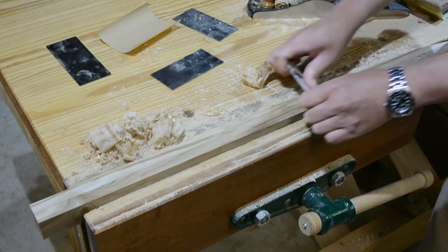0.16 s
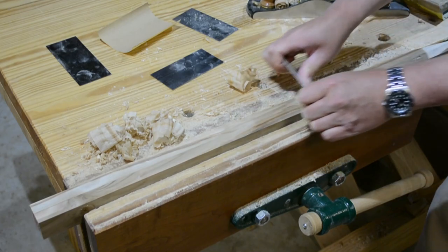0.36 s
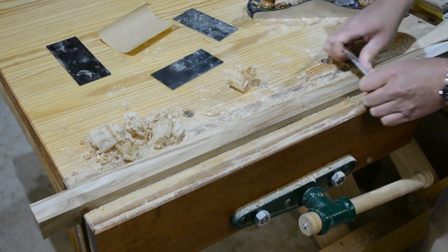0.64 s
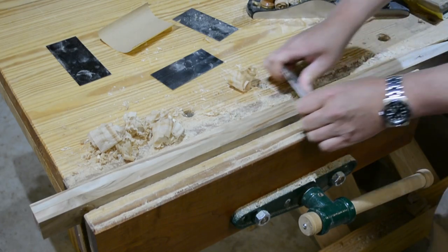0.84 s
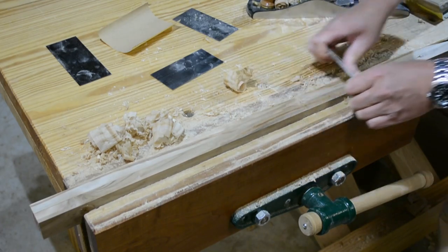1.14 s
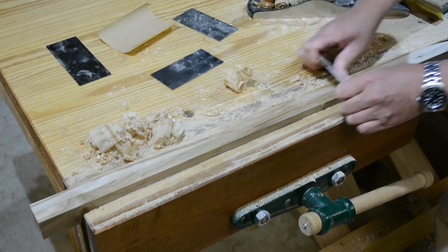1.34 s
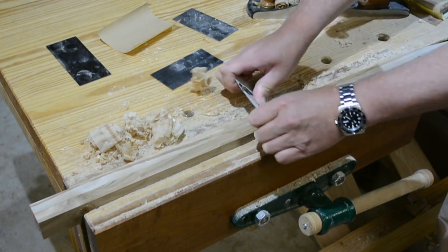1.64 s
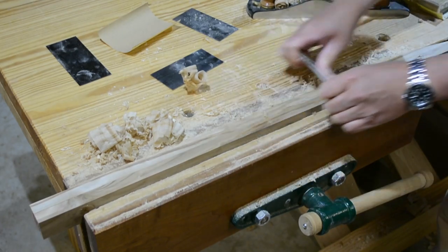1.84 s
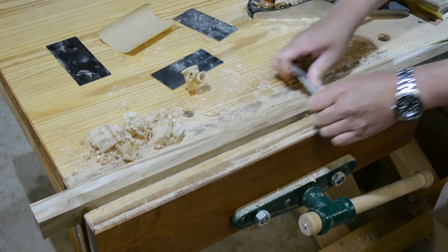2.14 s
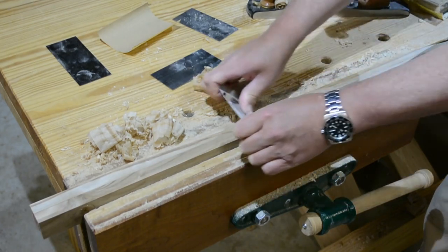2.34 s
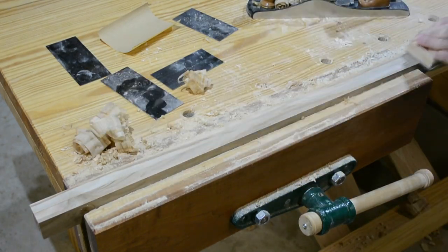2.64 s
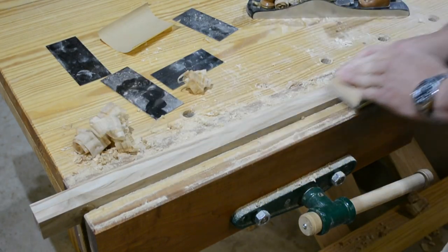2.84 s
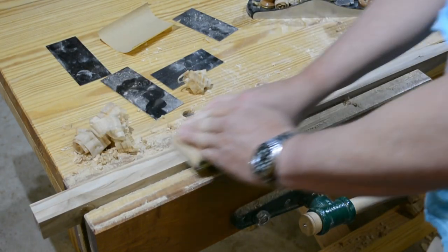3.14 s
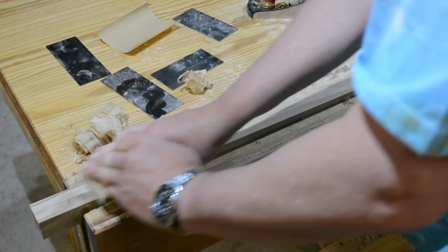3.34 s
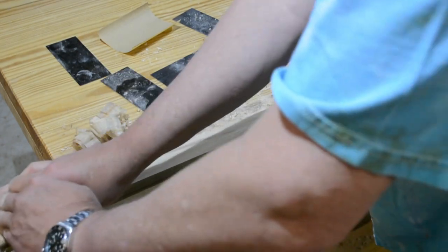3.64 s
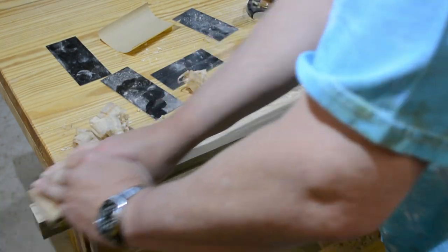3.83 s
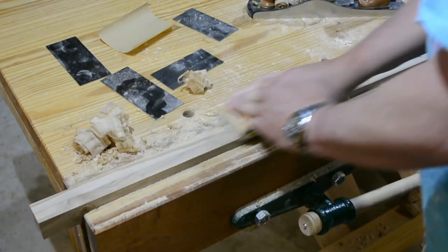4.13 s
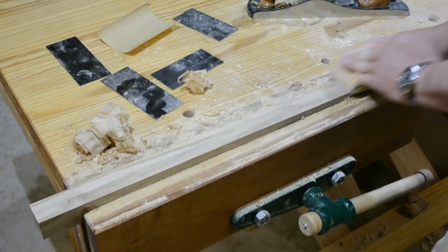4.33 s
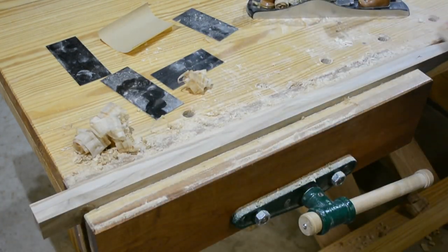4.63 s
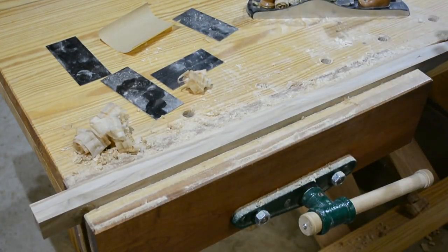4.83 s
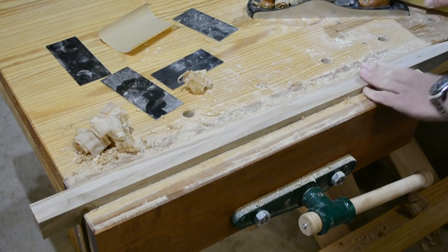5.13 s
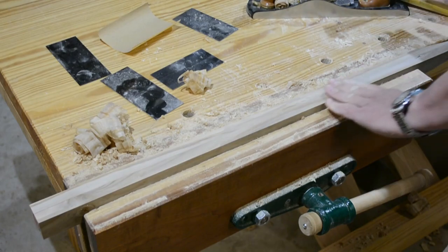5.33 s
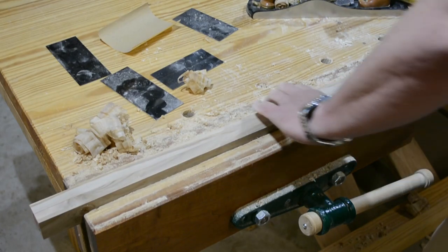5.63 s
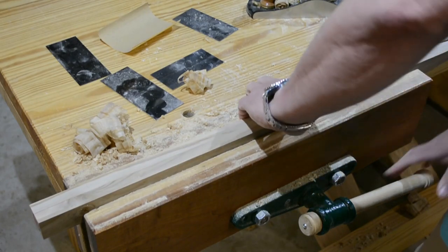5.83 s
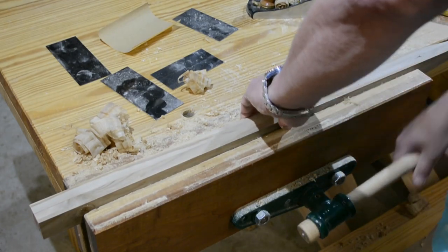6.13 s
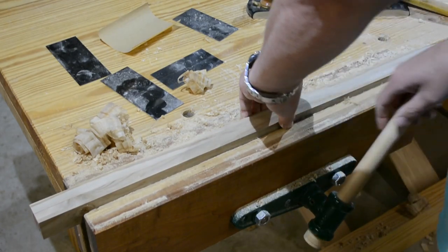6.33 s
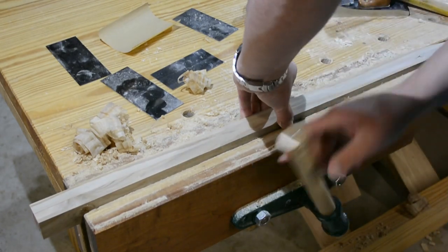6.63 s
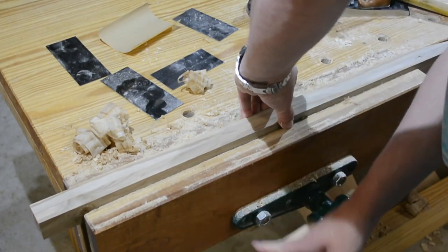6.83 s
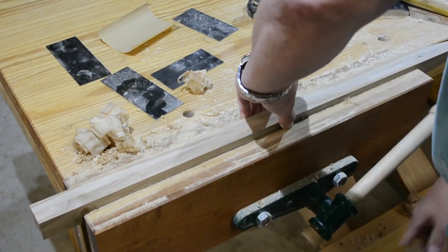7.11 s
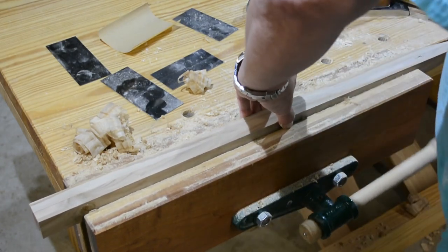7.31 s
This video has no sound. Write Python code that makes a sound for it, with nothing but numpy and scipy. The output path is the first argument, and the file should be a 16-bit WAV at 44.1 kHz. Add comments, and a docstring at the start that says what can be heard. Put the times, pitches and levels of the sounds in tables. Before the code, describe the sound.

In a small, quiet workshop, close stereo microphones catch a steel scraper finishing one stroke on a wooden rail, dragging lightly back, then cutting three more bright, ringing strokes with small rattling tocks between. A sanding block hisses out and back with a hollow woody drone. A hand taps and brushes the wood softly, then a vise jaw clunks hard and its wooden handle clacks.

```python
"""A steel scraper stroke already under way on a wooden rail, then a light drag back and three more strokes.
A sanding block runs out and back, a palm wipes the dust, then a vise jaw clunks and its handle drops.
Rubbing is noise of tiny slips through resonances; knocks are short pushes plus decaying modes.
Small workshop with faint hum and reverberation, taken by a close stereo microphone pair."""
import sys
import numpy as np
from scipy import signal
from scipy.fft import rfft, irfft
from scipy.io import wavfile
from scipy.ndimage import uniform_filter1d

SR = 44100
rng = np.random.default_rng(int(sys.argv[2]) if len(sys.argv) > 2 else 0)


def master_out(mix):
    """Clip the mix to full scale and print it as 16-bit PCM to the path in sys.argv[1]."""
    frames = np.transpose(np.atleast_2d(mix))
    ceiling = np.clip(frames, -1, 1)
    pcm = np.round(ceiling * 32767).astype(np.int16)
    wavfile.write(sys.argv[1], SR, pcm)


N = 329427
TIME = np.arange(N) / SR

# relative spectrum of rubbing: (frequency [Hz], density [dB per Hz])
FIZZ = [(100, -32), (300, -9.5), (1000, -9), (3500, 4.5), (4500, 3), (6000, 0), (8300, 1.5), (10500, -0.5),
        (12500, -8), (15500, -21.5)]


def amp(db):
    """Decibels to gain."""
    return 10 ** (np.asarray(db) / 20)


def evened(x):
    """Scales to rms 1."""
    return x / np.sqrt(np.mean(x ** 2) + 1e-20)


def read(points, hz):
    """Reads a table on a log-frequency axis."""
    table_hz, value = np.transpose(points)
    return np.interp(np.log(hz + 1), np.log(table_hz + 1), value)


def curve(rows):
    """A (time [s], value) curve at every sample."""
    return np.interp(TIME, *np.transpose(rows))


def add(mix, s, sound):
    """Mixes a sound in at time s."""
    part = mix[max(round(s * SR), 0):][:len(sound)]
    part += sound[:len(part)]


def colour(x, spectrum, size=4096):
    """Causal minimum-phase filter with the given spectrum."""
    log_gain = np.log(amp(read(spectrum, np.abs(np.fft.fftfreq(size, 1 / SR)))))
    taps = np.fft.ifft(np.exp(np.conj(signal.hilbert(log_gain)))).real
    return signal.oaconvolve(x, taps[:size // 2])[:len(x)]


def resonances(x, modes, place=0, node_db=0):
    """Band-pass resonances; each fades as the contact passes its nodes (place in half waves at 1 kHz)."""
    out = 0
    for k, (hz, width, db) in enumerate(modes):
        # bending waves shorten with the square root of frequency
        shape = np.cos(2 * np.pi * place * np.sqrt(hz / 1000))
        band = signal.lfilter(*signal.iirpeak(hz, hz / width, SR), x)
        out = out + (-1) ** k * amp(db + node_db * shape) * band
    return out


def focus(x, hz, octaves, depth_db):
    """Favours the band round a moving centre, at constant power."""
    f, t, z = signal.stft(x, SR, nperseg=512)
    away = np.log2((f[:, None] + 1) / np.interp(t, TIME, hz)) / octaves
    gain = amp(depth_db * np.exp(-away ** 2 / 2))
    power = np.mean(abs(z) ** 2, axis=1)
    power_gain = power @ gain ** 2 / power.sum()
    return signal.istft(z * gain / np.sqrt(power_gain), SR, nperseg=512)[1][:N]


def wander(rate_hz):
    """Smooth random curve of rms 1, up to about the given rate."""
    lowpass = np.exp(-(np.fft.rfftfreq(N, 1 / SR) / rate_hz) ** 2)
    return evened(irfft(rfft(rng.standard_normal(N)) * lowpass, N))


def friction(grip, grain_db):
    """Countless tiny slips, whose size follows the momentary grip."""
    return evened(rng.standard_normal(N) * amp(grain_db * grip))


def contact(start, end, attack_s, release_t60):
    """Gain of a rub: it rises from start and, after end, dies away."""
    rise = np.clip((TIME - start) / attack_s, 0, 1)
    return rise * amp(-60 * np.maximum(TIME - end, 0) / release_t60)


def swell(times, db, start_db, end_db):
    """Gain that grows to db at the middle of three times and eases off again by start_db and end_db."""
    away = np.interp(TIME, times, [-1, 0, 1])
    return amp(db - np.where(away < 0, start_db, end_db) * abs(away) ** 1.04)


def shop_air():
    """Steady coloured room noise with a faint, slightly wavering hum."""
    # room noise: (frequency [Hz], relative density [dB per Hz])
    air = [(15, -80), (25, -52), (101, -19), (183, -9), (209, -9), (281, -3.5), (313, -8), (421, -7),
           (522, -5), (631, -4.5), (996, -5.5), (2010, -10), (3170, -19.5), (9810, -33), (15500, -40)]
    # hum of the shop: (frequency [Hz], rms level [dB])
    hum_tones = [(78, -100.5), (100, -92.5), (283, -86)]
    air_db = -69.5
    hum = 0
    for hz, db in hum_tones:
        cycles = hz * TIME + 0.13 * wander(rate_hz=5.3)
        hum = hum + amp(db) * np.sqrt(2) * np.sin(2 * np.pi * cycles)
    return amp(air_db) * evened(colour(rng.standard_normal(N), air)) + hum


def soft_rubs():
    """Faint dry rubs from uneven friction and dull soft rustles from smooth noise, between the louder work."""
    # relative spectra of dry rub and soft rustle: (frequency [Hz], density [dB per Hz])
    dry_spectrum = [(500, -12), (2000, 8.5), (4000, 6), (7000, 3.5), (10500, 3), (13000, -10), (16000, -25)]
    soft_spectrum = [(400, -21), (900, -3.5), (1500, 2.5), (2500, -6.5), (3500, -4.5), (5000, -16),
                     (9000, -49)]
    # faint dry rubs, round the scraper's light drag, after strokes, in the palm's wipe and at the vise:
    # (start [s], end [s], level [dB])
    dry_rubs = [(.29, .49, -83), (0.492, .585, -62), (2.42, 2.498, -78), (4.99, 5.12, -81),
                (5.114, 5.152, -63.5), (5.24, 5.553, -73.5), (5.6, 5.95, -79.5), (6.0, 6.038, -77.5),
                (6.11, 6.26, -78.5), (6.34, 6.56, -80.5), (6.633, 6.83, -82), (7.17, 7.26, -86),
                (7.38, 7.445, -76.5)]
    # dull soft rustles, the first two round the light drag:
    # (start [s], strongest [s], time from which it fades, may precede its start [s], level [dB])
    rustles = [(0.304, 0.373, 0.52, -68), (0.482, 0.56, 0.71, -54), (5.09, 5.165, 4.9, -66),
               (5.583, 5.71, 6.22, -65), (6.72, 6.81, 7.5, -77), (7.342, 7.42, 8.1, -72)]
    dry_noise = evened(colour(friction(wander(rate_hz=300), grain_db=1.5), dry_spectrum))
    soft_noise = evened(colour(rng.standard_normal(N), soft_spectrum))
    rub_gains = [amp(db) * contact(start, end, attack_s=0.029, release_t60=0.32)
                 for start, end, db in dry_rubs]
    rub_gain = np.max(rub_gains, axis=0)
    rustle_gain = 0
    for *times, db in rustles:
        gate = contact(times[0], times[2], attack_s=0.044, release_t60=0.2)
        rustle_gain = rustle_gain + gate * swell(times, db, start_db=7, end_db=22)
    return rub_gain * dry_noise + rustle_gain * soft_noise


def knocks(rows, modes, spectrum, thud_t60, rattle, ring_db, damping, spot_db):
    """Each blow is a push with a brief rattle, plus ringing modes, coloured by where and how hard it lands."""
    t, out, ring = np.arange(SR * 3 // 5) / SR, np.zeros(N), 0
    for k, (hz, db, t60) in enumerate(modes):
        ring = ring + (-1) ** k * amp(db - 60 * damping * t / t60) * np.sin(2 * np.pi * hz * t)
    for s, db, hard_hz, note_hz in rows:
        chatter = rng.standard_normal(len(t)) * amp(-60 * t / thud_t60)
        push = signal.unit_impulse(len(t)) + rattle * chatter / np.linalg.norm(chatter)
        thud = colour(push, spectrum)
        blow = thud / np.linalg.norm(thud) + amp(ring_db) * ring / np.linalg.norm(ring)
        blow = blow + resonances(blow, [(note_hz, note_hz / 5, spot_db)])
        blow = signal.lfilter(*signal.butter(3, hard_hz, fs=SR), blow)  # softer contacts are duller
        add(out, s, amp(db) * blow / (2 * np.std(blow[:SR // 100])))
    # small things radiate little bass
    return signal.sosfilt(signal.butter(2, 85, "high", fs=SR, output="sos"), out)


# In the five functions below, the tables have these columns:
# blows: (time [s], level [dB], hardness as low-pass corner [Hz], note favoured by the spot struck [Hz])
# modes: (frequency [Hz], relative level [dB], t60 before division by damping [s])
# push: (frequency [Hz], relative density [dB per Hz])
def finger_taps():
    """Fingers land on the rail: a very short slap and quickly damped modes."""
    blows = [(5.051, -70, 11000, 8000), (5.166, -45, 2200, 676), (5.175, -41, 5970, 1910),
             (5.212, -51, 11000, 1190), (7.444, -61, 11000, 8000)]
    modes = [(475, -7, 0.25), (680, -14, .2), (1232, 6.5, 0.15), (1450, 7, 0.12), (2040, 3.5, 0.073),
             (2600, -14, .1)]
    push = [(150, -33), (480, -9), (700, -8), (920, -3), (1200, 10), (2100, -13), (3500, -12.5),
            (6000, -20), (11000, -11), (15000, -20)]
    return knocks(blows, modes, push, thud_t60=0.0078, rattle=1.2, ring_db=-5.0, damping=3.7, spot_db=-4)


def screw_clinks():
    """The iron screw of the vise clinks in a few high modes."""
    blows = [(6.146, -51, 5000, 2740), (6.902, -60, 4500, 2620)]
    modes = [(2670, 2, 0.19), (2730, -3, 0.14), (2910, -18, .2), (4160, 1, .15)]
    push = [(1200, -45), (2300, 3), (2800, 5.5), (3400, -8), (4200, -4.5), (8000, -32)]
    return knocks(blows, modes, push, thud_t60=0.098, rattle=1.6, ring_db=-6.0, damping=2.1, spot_db=1)


def handle_knocks():
    """The wooden vise handle slides in its socket and hits its end cap, a clack with damped modes."""
    blows = [(6.878, -47.5, 785, 716), (6.917, -43.5, 840, 596), (6.932, -40, 1150, 760),
             (6.950, -43.5, 750, 277), (7.181, -54, 900, 750), (7.214, -29, 1590, 890),
             (7.266, -40.5, 1310, 890)]
    modes = [(490, -11, 0.36), (645, -19, 0.29), (777, -27, 0.51), (869, 3.5, 0.14), (960, -3, 0.11),
             (1006, -5, 0.44), (1080, -2.5, 0.76), (1140, -3, 0.66), (1330, -22, 0.37), (1516, -3, 0.32),
             (1825, -32, 0.14)]
    push = [(80, -48), (160, -26), (270, -12), (370, -18.5), (490, -1.5), (930, -2), (1500, -10),
            (2000, -20), (4500, -13.5), (9000, -22)]
    return knocks(blows, modes, push, thud_t60=0.12, rattle=1.8, ring_db=-6.5, damping=2.5, spot_db=2.5)


def jaw_knocks():
    """The vise jaw shifts and seats, each blow a thud that rings its modes."""
    blows = [(6.012, -48.5, 700, 520), (6.028, -46.5, 815, 278), (6.054, -39.5, 1170, 830),
             (6.093, -41.5, 1410, 1010), (6.113, -37.5, 750, 505), (6.146, -26.5, 2100, 1270),
             (6.175, -30, 1180, 720), (6.519, -55.5, 1110, 770), (6.845, -48.5, 900, 286)]
    modes = [(149.5, -19, 0.55), (447, -14, 0.42), (487.4, -15, 0.45), (591, -8, 0.27), (675, 0, 0.38),
             (728.5, -2.5, 0.53), (877, -18, .37), (1030, -12, 0.38), (1210, 1, 0.29), (1270, -2, 0.43),
             (1320, -0.5, 0.32), (1408, -7, 0.33), (1610, -25, 0.24), (1730, -21, 0.28)]
    push = [(50, -28), (90, -15), (150, -15.5), (200, -16.5), (280, -8.5), (370, -12.5), (500, 1.5),
            (750, 3), (1100, -6), (1800, -2.5), (2200, -26), (9000, -30)]
    return knocks(blows, modes, push, thud_t60=0.085, rattle=1.6, ring_db=-3.5, damping=1.57, spot_db=1.0)


def set_downs():
    """The scraper is set down on the rail, a rattling tock that rings the rail's modes."""
    blows = [(.605, -35.5, 1740, 915), (.626, -44, 900, 467), (.992, -56, 780, 580),
             (1.239, -40.5, 3500, 1740), (1.984, -38, 3320, 776), (2.005, -40, 1020, 490)]
    modes = [(469, -8.5, 0.25), (586, 0, 0.23), (738, 0.5, 0.27), (869.6, 7, 0.31), (1854, -3, 0.31),
             (1954, 3.5, 0.16), (2120, -10, 0.12), (2820, -13, 0.068)]
    push = [(70, -22), (140, -13.5), (360, -13), (470, 2), (650, -2.5), (930, 1), (1320, -17), (1850, -4),
            (2500, -16), (9000, -26)]
    return knocks(blows, modes, push, thud_t60=0.078, rattle=3.8, ring_db=-5.5, damping=1.07, spot_db=5)


def sander():
    """Grit hisses; near the vise the block rings higher, away from it bench top and rail drone and boom."""
    # passes out, back, and sliding off the end on the block's edge:
    # (start [s], end [s], grit hiss [dB], body of the wood [dB], hollow boom [dB]), before place and pressure
    passes = [(2.507, 3.593, -53, -1, -57), (3.702, 4.639, -52, 1.5, -57), (4.63, 4.863, -64, -4, -83)]
    # the block's way along the rail: (time [s], distance from the free end [m])
    travel = [(2.5, 0.85), (2.75, 0.86), (3.0, 0.63), (3.12, 0.39), (3.42, 0.083), (3.7, .03), (3.88, 0.1),
              (4.32, .62), (4.45, 0.84), (4.85, 1.17)]
    # how hard the hands bear on the block: (time [s], pressure [dB])
    press = [(2.63, -11.5), (2.81, -2.5), (2.96, -5), (3.08, 3), (3.33, -0.5), (3.52, 3.5), (3.7, -5),
             (3.95, 2), (4.11, -2.5), (4.32, 0), (4.42, -3.5), (4.76, -2.5), (4.88, -8)]
    # resonances of block, bench top and hollow boom: (frequency [Hz], width [Hz], relative level [dB])
    block_modes = [(1372, 95, 4.5), (1587, 130, 3.5), (1774, 99, 5), (2076, 380, -1.5), (2520, 180, -0.5),
                   (2760, 210, 1), (3420, 1550, -8.5)]
    bench_modes = [(756, 69, -2), (832, 39, 0.5), (942, 72, 1), (1050, 216, 1), (1207, 263, 1.5)]
    boom_modes = [(315, 35, -22.5), (462, 42, -0.5), (511, 46, 2), (599, 50, -1.5)]
    # high rail mode singing under the grit: (frequency [Hz], width [Hz], level before the place gain [dB])
    rail_sing = [(3086, 46, 5)]
    vise_m, vise_reach_m = 0.56, 0.3  # where the vise holds the rail, and how far its hold is felt
    free_ring_hz, held_ring_hz = 1607, 2226  # the held part of the rail is stiffer
    half_wave_m = 0.287  # at 1 kHz
    drone_hz, drone_hz_per_m_s = 640, 438  # a faster block excites higher modes of the bench top
    dead_m, dead_reach_m, dead_db = 0.7, 0.17, 8.8  # dead spot of the bench top

    metres, press_db = curve(travel), curve(press)
    held = np.exp(-((metres - vise_m) / vise_reach_m) ** 2)
    ring_hz = free_ring_hz + (held_ring_hz - free_ring_hz) * held
    place = metres / half_wave_m
    speed = abs(uniform_filter1d(np.gradient(metres) * SR, size=SR // 6))
    grip = wander(rate_hz=600)

    hiss = evened(colour(friction(grip, grain_db=0.8), FIZZ))
    hiss = hiss + amp(8.5 - 21 * metres) * resonances(hiss, rail_sing)  # most near the free end
    hiss = focus(hiss, 2.0 * ring_hz, octaves=0.29, depth_db=1.5)  # the block's next mode follows its ring
    hiss = amp(0.18 * press_db + 1.7 * held) * hiss

    ring = resonances(friction(grip, grain_db=0.5), block_modes, place, node_db=0.5)
    ring = evened(colour(ring, [(900, -33.5), (1400, -1.0), (3800, 2.5), (6500, -22.5)]))
    ring = focus(ring, ring_hz, octaves=0.73, depth_db=25.5)

    drone = resonances(friction(grip, grain_db=0.4), bench_modes, place, node_db=1.5)
    drone = evened(colour(drone, [(350, -10.0), (700, 1), (1350, 1.5), (3000, -30)]))
    drone = focus(drone, drone_hz + drone_hz_per_m_s * speed, octaves=0.53, depth_db=7)
    dead = np.exp(-((metres - dead_m) / dead_reach_m) ** 2)
    drone_db = 0.3 * press_db - 47.0 - 4.1 * metres - dead_db * dead

    boom = resonances(friction(grip, grain_db=2.5), boom_modes)
    boom = evened(colour(boom, [(100, -10), (300, -10), (650, -8.5), (2000, -27)]))
    boom = amp(3.5 * metres - 21 * held) * boom  # the vise damps the boom

    body = amp(press_db - 42.5) * ring + amp(drone_db) * drone
    out = 0
    for start, end, hiss_db, body_db, boom_db in passes:
        layers = amp(hiss_db) * hiss + amp(body_db) * body + amp(boom_db) * boom
        out = out + contact(start, end, attack_s=0.12, release_t60=0.3) * layers
    return out


def scraper():
    """The burr tears fibres in clumps: fizz at the edge, ringing in the bowed blade and in the rail."""
    # strokes, the light one a drag backwards: (touches [s], presses hardest [s], lifts [s], level [dB],
    # centre of the ring at the hardest push [Hz], extra ring of the wood [dB])
    strokes = [(-.15, 0.08, 0.26, -.5, 1990, 2), (0.465, 0.564, 0.66, -13, 1610, 6),
               (0.641, 0.831, 0.92, 0, 1930, -0.5), (1.257, 1.504, 1.633, 0.5, 2000, 1),
               (1.998, 2.24, 2.368, 0.5, 2030, -0.5)]
    # the edge catches in the grain: (time [s], level before a 2 dB cut [dB])
    catches = [(0.7692, -33), (0.7947, -33), (0.835, -34), (0.8618, -28.5), (2.167, -36), (2.2296, -27.5),
               (2.2569, -30)]
    # resonances of blade and wood: (frequency [Hz], width [Hz], relative level [dB])
    blade_modes = [(1760, 90, 2), (2037, 210, -1.5), (2150, 154, 0.5), (2321, 77, 1), (2660, 230, -7),
                   (2970, 470, -18), (3670, 83, -15), (3920, 74, -17.5)]
    wood_modes = [(294, 78, -19), (440, 39, -10), (567, 26, -4.5), (737, 112, -5), (830, 137, -2.5),
                  (1010, 130, -4), (1200, 63, -2), (1507, 117, -1.5)]
    # a steel edge is brighter than grit: (frequency [Hz], extra level [dB])
    steel_tilt = [(3000, 0.5), (5500, -0.5), (9000, 2.5), (14000, 5)]
    bite_s, lift_t60 = 0.1, 0.21  # the edge bites in and lifts off
    ring_sag = 0.032  # share by which the ring sinks in half a stroke
    wood_lag_s = 0.05  # the rail answers later than the blade, as the edge digs in
    # one rail mode climbs as the edge nears the vise [Hz]: at the start, the hardest push and the end
    wood_glide = (680, 1200, 1440)
    # layers: dB at the hardest push before the stroke's level, dB less at the start, dB less at the end
    cut_fizz, cut_blade, cut_wood = (-50.5, 8.5, 8), (-39.5, 23.3, 13.9), (-49, 25, 7.4)

    grip = evened(wander(rate_hz=200) + wander(rate_hz=37))
    fizz = evened(colour(colour(friction(grip, grain_db=1.2), FIZZ), steel_tilt))
    tearing = friction(grip, grain_db=0.5)
    blade = resonances(tearing, blade_modes)
    blade = evened(colour(blade, [(500, -17.5), (1500, -12.5), (4000, -12.0), (7000, -27)]))
    wood = resonances(tearing, wood_modes)
    wood = evened(colour(wood, [(100, -4), (300, -3.5), (1600, -3.5), (4000, -24)]))

    ring_hz, wood_hz, gains = np.zeros(N), np.zeros(N), np.zeros((3, N))
    for start, peak, end, db, hz, wood_db in strokes:
        times = [start, peak, end]
        later = [start, min(peak + wood_lag_s, end), end]
        gate = amp(db) * contact(start, end, bite_s, lift_t60)
        wood_gain = amp(wood_db) * swell(later, *cut_wood)
        gains += gate * np.array([swell(times, *cut_fizz), swell(times, *cut_blade), wood_gain])
        begun = TIME >= start
        wood_hz = np.where(begun, np.interp(TIME, times, wood_glide), wood_hz)
        sinking_hz = hz * (1 + ring_sag * np.interp(TIME, times, [1, 0, -1]))
        ring_hz = np.where(begun, sinking_hz, ring_hz)
    blade = focus(blade, ring_hz, octaves=0.17, depth_db=8.5)  # the ring sinks as the blade travels
    # and lower modes of the rail join in
    wood = focus(wood, 1150 * (ring_hz / 1920) ** 4, octaves=1.0, depth_db=7.5)
    wood = focus(wood, wood_hz, octaves=0.14, depth_db=5)
    out = (gains * [fizz, blade, wood]).sum(0)

    snap = resonances(signal.unit_impulse(SR // 10), blade_modes)
    for s, db in catches:
        add(out, s, amp(db - 2.0) * snap / abs(snap).max())
    return out


def reverberate(x, size=20):
    """Sparse reflections of random sign, each band dying at its own speed; energy 1."""
    # the workshop's reverberation: (frequency [Hz], t60 [s])
    shop = [(100, 0.37), (500, 0.4), (1500, 0.23), (4000, 0.44), (12000, 0.05)]
    taps, at = np.zeros(SR), np.arange(SR // 250, SR - size, size)
    taps[at + rng.integers(0, size, len(at))] = rng.choice([-1., 1.], len(at))
    hz, t, z = signal.stft(taps, SR, nperseg=256)
    t60 = read(shop, hz)[:, None]
    tail = signal.istft(z * amp(-60 * t / t60) / np.sqrt(t60), SR, nperseg=256)[1]
    return signal.fftconvolve(x, tail / np.linalg.norm(tail))[:N]


def scene():
    """All sources in the workshop, heard by two closely spaced microphones."""
    # reverberant side signal of the pair: (frequency [Hz], side gain [dB])
    width = [(70, -28), (500, -24), (1500, -34.5), (3000, -25.5), (5000, -25), (9000, -11), (14000, -5)]
    # balance of the pair: (frequency [Hz], left minus right [dB])
    lean = [(100, 0.59), (350, 1.5), (1400, .2), (5000, 0.28), (9000, 1.4), (14000, 2.1)]
    # steady noise in the side signal only, heard with opposite sign in the two channels: (frequency [Hz],
    # relative density [dB per Hz])
    side_noise = [(50, -25), (150, -11), (400, -0.5), (1000, 3.5), (2000, -2.5), (5000, -11.5), (10000, -20),
                  (15000, -30)]
    side_noise_db = -77
    blows = finger_taps() + screw_clinks() + handle_knocks() + jaw_knocks() + set_downs()
    rubs = soft_rubs() + sander() + scraper()
    dry = shop_air() + blows + rubs
    mid = dry + reverberate(amp(-11.5) * rubs + amp(-3.5) * blows)
    side = colour(reverberate(dry), width)  # the microphones differ mostly in the treble
    side = side + amp(side_noise_db) * evened(colour(rng.standard_normal(N), side_noise))
    half_lean = np.array(lean) * [1, 0.5]
    left = colour(mid + side, half_lean)
    right = colour(mid - side, half_lean * [1, -1])
    return np.array([left, right])


def record(dry):
    """The recorder's band limit: a steep low-pass at 15740 Hz."""
    lowpass = signal.firwin(801, 15740, window=("kaiser", 9), fs=SR)
    return signal.oaconvolve(dry, lowpass[None], "same")


dry = scene()
out = record(dry)
master_out(out)
```